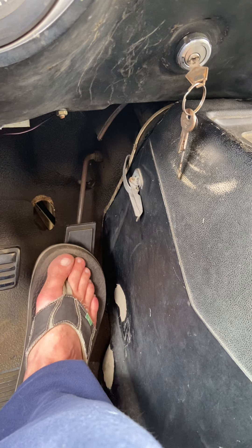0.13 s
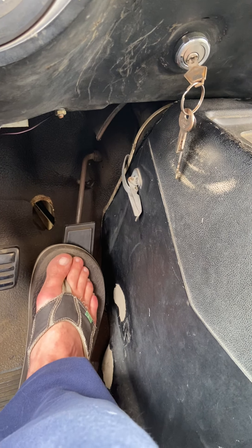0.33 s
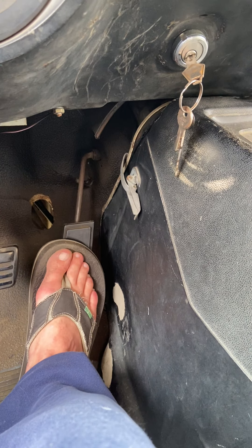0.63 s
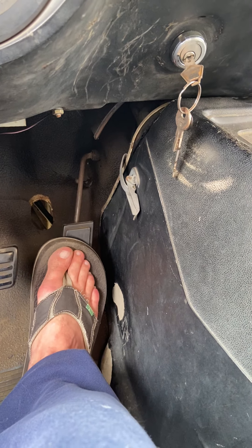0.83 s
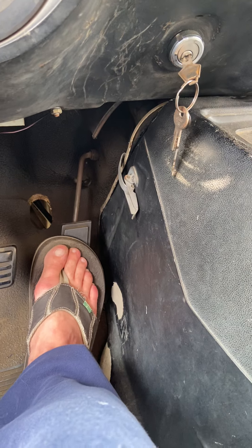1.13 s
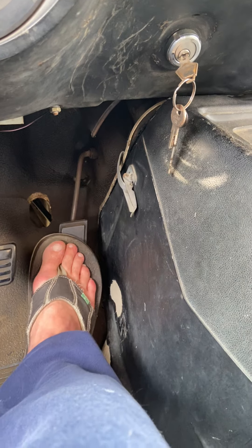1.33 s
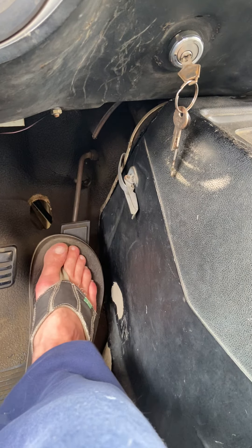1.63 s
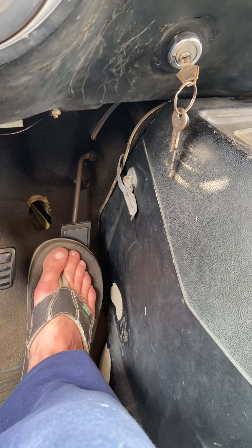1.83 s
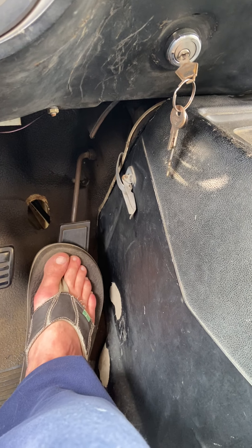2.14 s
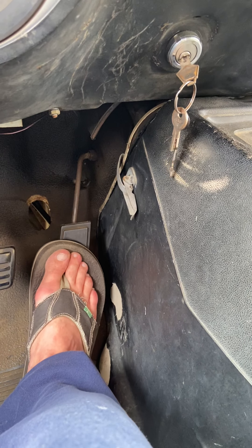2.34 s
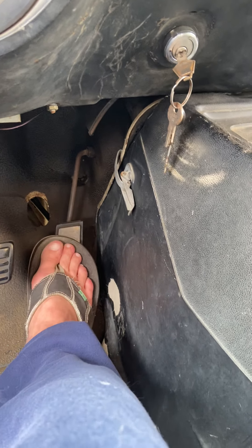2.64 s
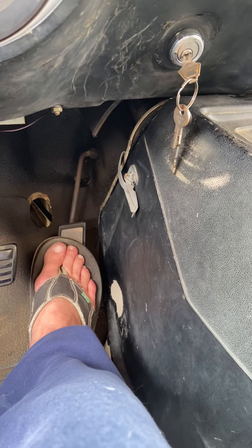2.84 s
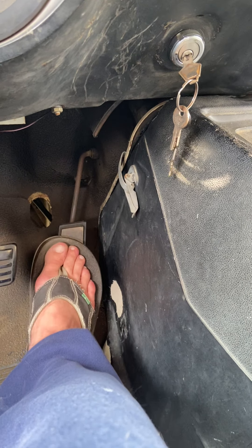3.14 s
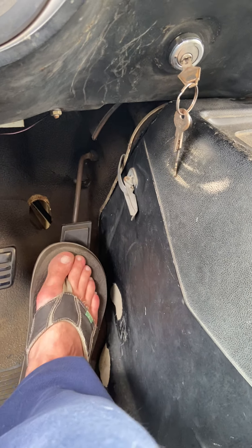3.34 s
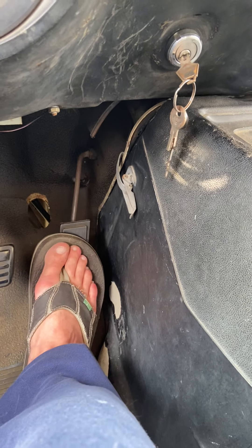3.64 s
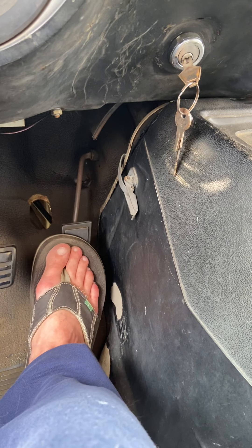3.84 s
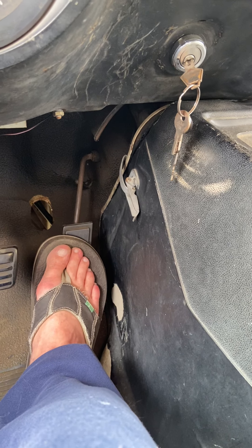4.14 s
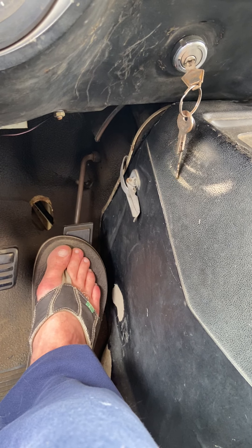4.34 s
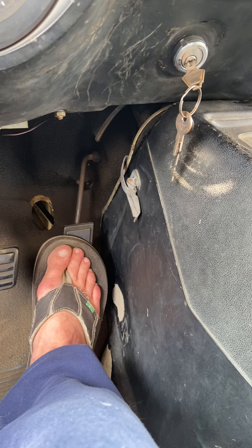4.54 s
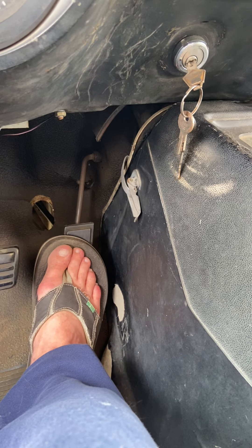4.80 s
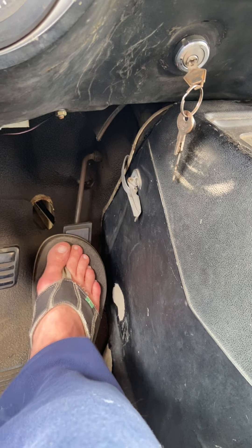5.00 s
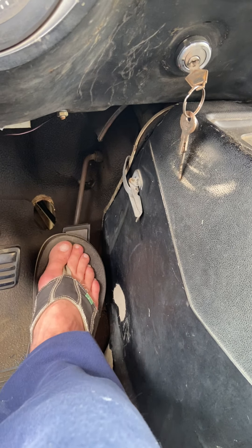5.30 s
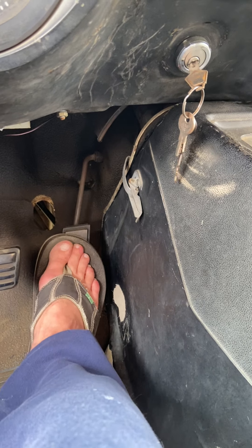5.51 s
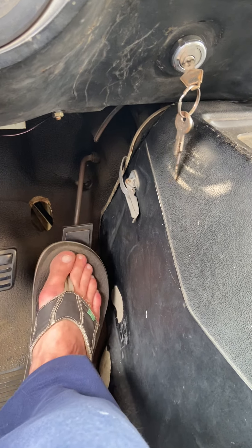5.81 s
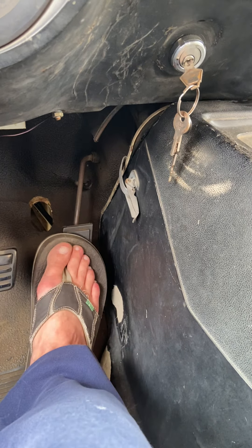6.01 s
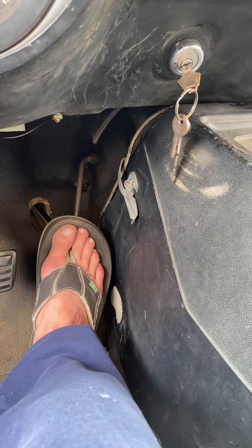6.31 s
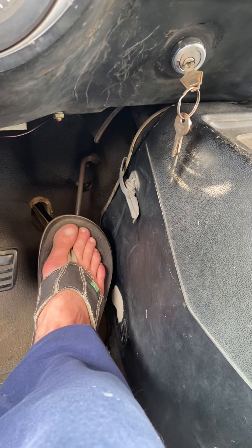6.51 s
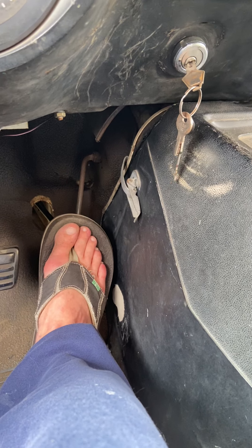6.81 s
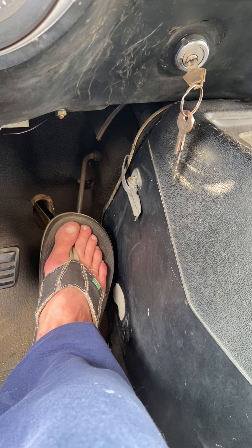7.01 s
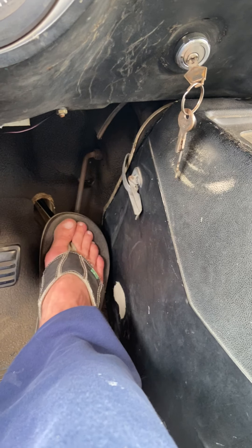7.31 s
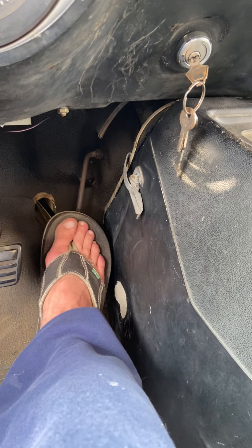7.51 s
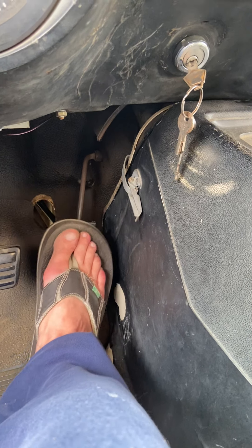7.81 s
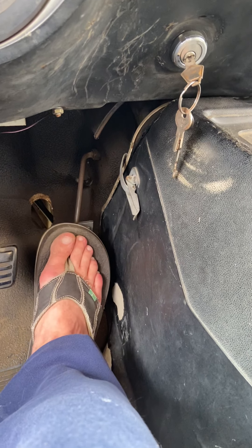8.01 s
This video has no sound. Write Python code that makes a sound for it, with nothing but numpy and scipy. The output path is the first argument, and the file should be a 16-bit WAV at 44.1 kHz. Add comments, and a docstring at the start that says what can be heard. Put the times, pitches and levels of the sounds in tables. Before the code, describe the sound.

Heard close in an old van's footwell through a phone's stereo microphones, a cold engine is already falling from a rev, its loose fan belt chirping about ten times a second until 0.5 s. It settles into a lumpy, booming idle with ticking tappets. Pedal rubs and thin, very high squeaks lead into a shorter blip at 1.3 s, peaking near 1.8 with belt honk and hoarse shrieks, then chirps. At 2.6 s a stronger blip stumbles, growls, coughs once and races to 3.3 s, the belt rasping and hissing; warbling chirps follow from 3.6 to 4.2. Uneven idle throbs until another squeaky press at 5.1 s, racing by 5.7 and chirping around 6 to 6.4. After more low idle, squeaks and scrapes at 7.2 s start the last blip, squealing to a peak near 7.8 and just beginning to run down and chirp at the end.

```python
"""Cold van engine in the footwell

A cold engine idles lumpily after a dying race and is blipped four times. Its firings force the mounts,
cab air and panels into resonance; filtered noise and overtones of the firing rate sound the intake.
The throttle linkage squeaks as gliding sines. The loose fan belt squeals by stick-slip, rasps as
modulated noise at high revs, and chirps once a belt turn as the engine runs down."""
import sys
import numpy as np
from scipy import signal
from scipy.fft import rfft, irfft, next_fast_len
from scipy.io import wavfile
from scipy.ndimage import uniform_filter1d

SR = 44100
rng = np.random.default_rng(int(sys.argv[2]) if len(sys.argv) > 2 else 0)


def log_audio(samples):
    """Write samples as a 16-bit WAV file to the path given in sys.argv[1]."""
    # one column per channel
    frames = np.atleast_2d(samples).T
    # limit to full scale, then quantise
    limited = np.clip(frames, -1, 1)
    pcm = np.round(limited * 32767).astype(np.int16)
    wavfile.write(sys.argv[1], SR, pcm)


N = 359415
T = np.arange(N) / SR
SIZE = next_fast_len(N + SR)  # padded, so that filter tails do not wrap around
FREQS = np.maximum(np.fft.rfftfreq(SIZE, 1 / SR), 1e-3)


def undb(db):
    """Logarithmic level: decibels to amplitude gain."""
    return 10 ** (np.asarray(db) / 20)


def unit(x):
    """Normalisation: scale to rms 1."""
    return x / np.sqrt(np.mean(x ** 2))


def steady(x, seconds):
    """Automatic gain: even out swells slower than the given time, keeping the quick throb."""
    size = int(seconds * SR)
    power = uniform_filter1d(uniform_filter1d(x ** 2, size), size)
    return x / np.sqrt(power + 1e-12)


def shape(x, response):
    """Linear filtering: multiply the spectrum by a frequency response."""
    return irfft(rfft(x, SIZE) * response, SIZE)[..., :N]


def colour(points):
    """Spectral envelope: zero-phase response through (Hz, dB) points."""
    hz, db = np.transpose(points)
    return undb(np.interp(np.log(FREQS), np.log(hz), db))


def ringing(points):
    """Minimum phase: a causal response through (Hz, dB) points, which rings on after each push."""
    cepstrum = irfft(np.log(colour(points)), SIZE)
    # folding the cepstrum onto positive time makes the response causal
    cepstrum[1:SIZE // 2] *= 2
    cepstrum[SIZE // 2 + 1:] = 0
    return np.exp(rfft(cepstrum))


def modes(table):
    """Modal superposition: summed response of (Hz, width in Hz, dB) resonances."""
    total = 0
    for hz, width, db in table:
        total = total + undb(db) / (1 + 1j * (FREQS ** 2 - hz ** 2) / (FREQS * width))
    return total


def noise():
    """White noise: equal mean power at every frequency."""
    return rng.standard_normal(N)


def walk(rate_hz):
    """Band-limited chance: smooth random motion of rms 1, mostly below the given rate."""
    hz = FREQS[FREQS < 10 * rate_hz]
    chance = noise()[:2 * len(hz)]
    spectrum = (chance[::2] + 1j * chance[1::2]) / (1 + (hz / rate_hz) ** 4)
    size = next_fast_len(2 * 2 * len(hz))
    slow = irfft(spectrum, size)
    slow_times = np.arange(size) * SIZE / size / SR
    return unit(np.interp(T, slow_times, slow))


def ramp(start, seconds):
    """Linear onset: rises from 0 to 1 in the given time."""
    return np.clip((T - start) / max(seconds, 1e-3), 0, 1)


def gate(start, end, attack_s, release_s):
    """Envelope: attack, hold and release between two moments."""
    return ramp(start, attack_s) * (1 - ramp(end - release_s, release_s))


def hump(along):
    """Half-ellipse envelope over a note whose progress runs from 0 to 1."""
    return np.sqrt(8 * along * (1 - along))


def partials(phase, table, shimmer_db=3.0):
    """Additive synthesis: (multiple, dB) partials of a phase, each flickering by itself."""
    total = 0
    for multiple, db in table:
        total = total + undb(db + shimmer_db * walk(105)) * np.sin(multiple * phase)
    return total


def stick_slip(hz, rough, shake_hz=260.3):
    """Stick-slip friction: phase of rubber catching and letting go with a shaky period."""
    return 2 * np.pi * np.cumsum(hz * (1 + rough * walk(shake_hz))) / SR


# Throttle blips; the first is already dying away. Each row: nominal opening in s, engine catches in s,
# top of the revs in s, stumbling rate in Hz, top rate in Hz, idle rate after it in Hz,
# run-down time in s, relative belt rasp in dB, relative intake level in dB.
BLIPS = [(-0.92, -0.66, -0.4, 38, 80, 29.5, 0.65, 3, -29), (1.355, 1.665, 1.82, 39, 59, 32, 0.4, 2, -33),
         (2.685, 2.925, 3.3, 39, 81, 31, 0.65, -1, -26),
         (5.16, 5.385, 5.68, 39, 74.5, 31.3, 0.58, 0, -27.5),
         (7.305, 7.55, 7.78, 43.5, 73, 31, 0.58, 0, -26)]
# the throttle starts to open this far ahead of the nominal opening, and to shut at the top of the revs
OPEN_LEAD_S, OPEN_S, SHUT_S = 0.04, 0.09, 0.12
COAST_POWER = 1.7  # the flywheel holds the revs up at first: power of time in the run-down


def firing_rate():
    """Rotational inertia: the engine stumbles, catches, races to its top and coasts back to idle."""
    rate = np.zeros(N)
    for opens, catches, top, stumble_hz, top_hz, idle_hz, rundown_s, *_ in BLIPS:
        rate = rate + (stumble_hz - rate) * ramp(opens - OPEN_LEAD_S, OPEN_S)
        rate = rate + (top_hz - rate) * np.sin(np.pi / 2 * ramp(catches, top - catches))
        coast = np.exp(-(np.abs(T - top) / rundown_s) ** COAST_POWER)
        rate = np.where(T < top, rate, idle_hz + (top_hz - idle_hz) * coast)
    return rate


def throttle(opens, top):
    """Valve control: how far the throttle is open during one blip, 0-1."""
    return gate(opens - OPEN_LEAD_S, top + SHUT_S, OPEN_S, SHUT_S)


def at_speed(table, rate):
    """Interpolation: the columns of a table over firing rate, sample by sample."""
    hz, *columns = np.transpose(table)
    return np.array([np.interp(rate, hz, column) for column in columns])


# Loudness with the throttle open. Each row: firing rate in Hz, then relative levels in dB of cab boom,
# panel drone, clatter, belt rasp and belt hiss.
PULLING = [(38, -12, -21.5, -40.5, -39.5, -55), (57, -12.5, -21, -38.5, -28.5, -48),
           (69, -12.5, -19, -39, -21.5, -31), (80, -15, -16, -42, -22, -30)]
# The same with the throttle shut; a sagging idle booms, and the panels drone where an order meets them.
# Each row: firing rate in Hz, then relative levels in dB of boom, drone, clatter, rasp and hiss.
COASTING = [(30.5, -14, -27, -45.5, -57, -64), (32.3, -19, -24, -46.5, -56, -63),
            (38, -16.5, -27, -45, -55.5, -61), (46, -20, -27, -44, -54, -58),
            (58, -24, -19, -42.5, -41, -54), (68, -24, -22, -43, -34, -53), (80, -20, -17, -45, -30, -48)]


def loudness(rate, load):
    """Load dependence: five levels in dB between coasting (load 0) and pulling (load 1)."""
    return (1 - load) * at_speed(COASTING, rate) + load * at_speed(PULLING, rate)


# Resonance of the rubber mounts. The row: frequency in Hz, width of one stage in Hz, relative level in dB.
MOUNTS = (48, 23, -19.5)


def mounts(count, load, rumble_db=14.5, waver_db=2.5):
    """Forced resonance: the engine rumbles on its mounts and rocks hard as firings pass their frequency."""
    hz, width, db = MOUNTS
    rocking = unit(np.sin(2 * np.pi * count)) * (1 - load) * undb(waver_db * walk(9))
    response = modes([(hz, width, 0)]) ** 3
    return shape(rocking + undb(rumble_db) * noise(), response) * undb(db)


# Shaking forces of the engine. Each row: multiple of the firing rate, relative level in dB.
ORDERS_DB = [(0.5, -17), (0.75, -12), (1, -10), (1.25, -12), (1.5, -3), (1.75, -17), (2, 0), (2.25, -20),
             (2.5, -14), (3, -10), (3.25, -16), (3.5, -9), (4, -7), (5, -9), (6, -9)]


def shaking(count):
    """Engine orders: harmonics and fractions of the firing rate; uneven burns make each waver."""
    orders = 0
    for multiple, db in ORDERS_DB:
        sway_rad, waver_db = 0.28 * walk(6), 2.5 * walk(8)
        orders = orders + undb(db + waver_db) * np.sin(2 * np.pi * multiple * count + sway_rad)
    return unit(orders)


# How the air of the cab answers. Each row: frequency in Hz, gain in dB.
CAB = [(20, -27), (32, -21), (40, -12), (46, -6), (54, 1), (64, 0), (77, 2), (86, -3), (98, -14),
       (125, -38), (600, -100)]
# How the floor and engine cover answer. Each row: frequency in Hz, gain in dB.
PANELS = [(40, -50), (70, -36), (98, -10), (112, 3), (125, -1), (140, -11), (158, -10.5), (178, -25),
          (260, -42), (900, -100)]
# ragged burns: their rumble against the engine orders, and how it grows with the firing rate
RUMBLE_DB, RUMBLE_FROM_HZ, RUMBLE_DB_PER_HZ = 9, 31, 0.18


def boom(count, rate, boom_db, drone_db, burn_decay=0.35):
    """Cavity and plate resonance: orders and ragged cold burns shake air and panels; burns win at high revs."""
    # burn_decay is a share of one firing period
    thuds = unit(noise() * np.exp(-(count % 1) / burn_decay))
    rumble_db = RUMBLE_DB + RUMBLE_DB_PER_HZ * (rate - RUMBLE_FROM_HZ)
    drive = thuds * undb(rumble_db) - shaking(count)
    air = steady(shape(drive, ringing(CAB)), 0.06) * undb(boom_db)
    panels = steady(shape(drive, ringing(PANELS)), 0.09) * undb(drone_db)
    return air + panels


# Colour of the valve train and block. Each row: frequency in Hz, relative spectral density in dB per Hz.
CLATTER = [(150, 2), (220, 5), (275, 8), (340, -0.5), (450, -3), (560, 3), (820, -7), (965, -4),
           (1100, -12), (1780, -14.5), (1990, -7), (2200, -15.5), (2600, -20), (3500, -23), (6000, -23),
           (10000, -25), (16000, -28)]


def clatter(count, clatter_db, trim_db=8.0, tick_db=-5.0, tick_decay=0.16):
    """Impact noise: tappets tick twice a firing over the even rush of the block and fan."""
    # tick_decay is a share of one tick period
    ticks = np.exp(-(2 * count % 1) / tick_decay) * undb(tick_db + 4.3 * walk(37))
    return unit(shape(noise() * (1 + ticks), colour(CLATTER))) * undb(clatter_db + trim_db)


# Colour of the air intake. Each row: frequency in Hz, gain in dB.
INTAKE = [(130, -18), (160, 5), (200, 1), (240, -1), (280, -2.5), (330, -17), (480, -38)]
# The cold engine coughs once through the intake. The row: start in s, length in s, relative level in dB.
COUGH = (3.025, 0.04, -19)
# the intake growl fades as the revs rise past the stumble
GROWL_FULL_HZ, GROWL_FADE_DB_PER_HZ = 58, 0.62


def growl(count, rate, trim_db=-1.0, gulp_db=12.0):
    """Pulsating flow: gulped air sounds the intake with overtones of the firing rate and turbulence."""
    gain = sum(throttle(opens, top) * undb(db) for opens, _, top, *_, db in BLIPS)
    gain = gain * undb(-GROWL_FADE_DB_PER_HZ * np.maximum(rate - GROWL_FULL_HZ, 0))
    start, length, cough_db = COUGH
    gain = gain + undb(cough_db) * np.sin(np.pi * ramp(start, length))
    overtones = partials(2 * np.pi * count, [(2, -3), (3, -3), (4, 0), (5, -6), (6, -2), (7, -8), (8, -6)])
    intake = steady(shape(overtones + undb(gulp_db) * noise(), colour(INTAKE)), 0.1)
    return undb(trim_db) * gain * intake


# Modes of the pedal and its bracket. Each row: frequency in Hz, width in Hz, relative level in dB.
PEDAL = [(934, 45, 9), (730, 100, 4), (1882, 73, -12)]
# The pedal rubs in its bracket. Each row: start in s, length in s, relative level in dB.
SCRAPES = [(0.913, 0.031, -41), (1.037, 0.02, -33.5), (2.565, 0.076, -34), (2.652, 0.025, -38),
           (5.066, 0.051, -33), (5.13, 0.023, -33.5), (7.152, 0.043, -39), (7.205, 0.031, -35),
           (7.274, 0.044, -31.5)]


def pedal(trim_db=1.5):
    """Friction-excited modes: short dry rubs ring the pedal bracket."""
    force = np.zeros(N)
    for start, length, db in SCRAPES:
        along = np.clip((T - start) / length, 0, 1)
        force += undb(db + trim_db) * np.sin(np.pi * np.sqrt(along))
    ring = modes(PEDAL)
    return shape(noise() * force, ring) / np.sqrt(np.mean(np.abs(ring) ** 2))


# Throttle linkage squeaks. Each row: start in s, length in s, nominal start pitch in Hz,
# nominal end pitch in Hz, level in dB.
SQUEAKS = [(1.209, .05, 10140, 10350, -55), (1.261, 0.036, 10350, 10540, -38),
           (1.315, 0.02, 10600, 10620, -45), (1.332, .036, 12350, 12500, -44),
           (1.376, 0.036, 11650, 11400, -47), (1.562, 0.035, 5230, 5860, -38),
           (2.55, 0.045, 10030, 10500, -40.5), (5.033, .042, 10430, 10340, -36.5),
           (5.075, 0.034, 11960, 11720, -39), (7.165, 0.027, 10270, 10270, -44),
           (7.189, 0.053, 10350, 10700, -36.5), (7.279, 0.016, 11910, 11800, -45)]


def linkage():
    """Dry friction: the throttle pivot gives thin, gliding squeaks as the pedal goes down."""
    out, waver = np.zeros(N), 0.006 * walk(150)
    for start, length, from_hz, to_hz, db in SQUEAKS:
        along = np.clip((T - start) / length, 0, 1)
        hz = (from_hz + (to_hz - from_hz) * along) * (1 + waver)
        out += undb(db) * hump(along) * np.sin(2 * np.pi * np.cumsum(hz) / SR)
    return out


# Ring of the pulleys and brackets. Each row: frequency in Hz, width in Hz, relative level in dB.
PULLEYS = [(556, 42, 8), (1298, 57, 3), (1460, 80, 5.5), (2060, 55, 6.5), (3135, 72, -2), (3850, 90, 2),
           (4320, 46, -5.5), (4580, 69, -11), (5296, 66, -3.5), (5610, 23, -13)]
# Colour of rubber scraping on steel. Each row: frequency in Hz, relative spectral density in dB per Hz.
RASP = [(250, -54), (500, -1.5), (900, -1), (1500, -2), (2400, -6), (3300, -10.5), (4800, -6.5),
        (6000, -8.5), (7000, -24), (9000, -50), (16000, -52)]
# Colour of the belt's hiss. Each row: frequency in Hz, relative gain in dB.
HISS = [(4500, 5), (7000, -0.5), (9700, 3.5), (11500, -2.5), (13500, -3), (15500, -7)]


def rasp(count, rasp_db, hiss_db, ring_db=1.5, grit_db=0.9, flutter_db=0.7, swell_db=2.5, throb=0.26,
         rasp_trim_db=2.1, hiss_trim_db=7.0):
    """Sliding friction: dense tiny slips, tugged by each firing, scrape and ring separately swelling modes."""
    slips = undb(grit_db * walk(460) + flutter_db * walk(44)) * (1 + throb * np.cos(2 * np.pi * count))
    ring = sum(shape(noise(), modes([mode])) * undb(swell_db * walk(25)) for mode in PULLEYS)
    scrape = steady(shape(noise(), colour(RASP)) + undb(ring_db) * ring, 0.008)
    hiss = unit(shape(noise(), colour(HISS)))
    return slips * (scrape * undb(rasp_db + rasp_trim_db) + hiss * undb(hiss_db + hiss_trim_db))


# The belt breaks fully loose and the rasp jumps up. Each row: start in s, end in s, rise of the rasp in dB.
BITES = [(1.89, 2.04, 3), (2.69, 2.79, 2), (3.072, 3.2, 3), (5.44, 5.56, 3.5), (7.56, 7.625, 5.5),
         (7.668, 7.73, 2.5)]
BITE_ATTACK_S, BITE_RELEASE_S = 0.01, 0.035


def bites():
    """Loss of grip: the rise in dB of the rasp while the belt is fully loose."""
    return sum(gate(start, end, BITE_ATTACK_S, BITE_RELEASE_S) * db for start, end, db in BITES)


# A pulley mode catches and shrieks. Each row: start in s, length in s, mean pitch in Hz, relative level in dB.
SHRIEKS = [(1.39, 0.06, 3950, -39), (1.698, 0.07, 1515, -24), (1.855, 0.08, 1485, -22),
           (3.11, 0.075, 1470, -20), (3.115, 0.07, 3900, -26), (3.232, 0.062, 3920, -20),
           (5.495, 0.07, 1450, -20), (5.583, 0.035, 3830, -21), (7.668, 0.035, 1500, -19),
           (7.672, 0.056, 3850, -19)]


def shrieks():
    """Mode locking: at the hardest slips one pulley mode takes over in a short, hoarse shriek."""
    out, shake_hz = np.zeros(N), 75 * walk(200)
    for start, length, hz, db in SHRIEKS:
        phase = 2 * np.pi * np.cumsum(hz + shake_hz) / SR
        out += undb(db) * hump(ramp(start, length)) * np.sin(phase)
    return out * undb(-2 + 2.5 * walk(90))


# Belt chirps as the engine runs down. Each row: start in s, end in s, nominal moment in s when the belt's
# slickest patch meets the pulley, time of a belt turn in s, relative levels in dB of pulley ring and warble.
CHIRPS = [(-0.05, 0.275, 0.047, 0.098, -30, -29.5), (0.245, 0.38, 0.345, 0.1, -30, -37),
          (0.375, 0.48, 0.448, 0.1, -32, -39), (1.94, 2.065, 2.015, 0.1, -27, -36),
          (2.035, 2.15, 2.115, 0.1, -30, -30), (2.15, 2.24, 2.215, 0.1, -33.5, -39),
          (3.6, 3.735, 3.695, 0.09, -34, -39), (3.705, 3.99, 3.785, 0.094, -32, -32.5),
          (3.98, 4.11, 4.075, 0.1, -32, -37), (4.14, 4.21, 4.165, 0.1, -37, -50),
          (5.925, 6.265, 5.958, 0.09, -32.5, -33), (6.25, 6.36, 6.315, 0.1, -35.5, -42),
          (7.97, 8.3, 8.068, 0.09, -34, -33)]
# How the pulleys and brackets radiate the warble. Each row: frequency in Hz, gain in dB.
WARBLE = [(900, -22), (1230, -2), (1450, -2), (1650, -9), (2100, -13), (2450, 1), (2680, -1), (2830, -4),
          (3080, 2), (3200, -1), (3350, -14), (3680, 0), (4050, -10), (4550, -1), (4950, -9), (5400, -4),
          (6500, -20)]
CHIRP_ATTACK_S, CHIRP_RELEASE_S = 0.02, 0.035
CHIRP_RASP_DB = -8  # the belt keeps scraping faintly under its chirps: rasp against warble


def chirps(centre_hz=1375, swing_hz=140, ring_hz=1455, ring_width_hz=120, snap=2.4, trough_db=-3.0,
           turn_sway=0.3, flank_count=2, warble_trim_db=-0.3):
    """Frequency modulation: two rough belt flanks flip in pitch once a turn, and a pulley mode resonates."""
    swing, ring_gain, warble_gain = np.zeros(N), np.zeros(N), np.zeros(N)
    sway_rad = turn_sway * walk(45)
    for start, end, crest, turn_s, ring_db, warble_db in CHIRPS:
        turning = np.cos(2 * np.pi * (T - crest) / turn_s + sway_rad)
        swing = np.where(T > start, turning, swing)
        sounding = gate(start, end, CHIRP_ATTACK_S, CHIRP_RELEASE_S)
        ring_gain += sounding * undb(ring_db)
        warble_gain += sounding * undb(warble_db + warble_trim_db)
    # tanh squares off the swing, so the pitch flips rather than glides
    hz = centre_hz + swing_hz * np.tanh(snap * swing) / np.tanh(snap)
    flanks = 0
    for _ in range(flank_count):
        phase = stick_slip(hz, rough=0.07, shake_hz=600)
        flanks = flanks + partials(phase, [(1, -1), (2, 0), (3, -7), (4, -12)])
    ring = steady(shape(flanks, modes([(ring_hz, ring_width_hz, 0)]) ** 2), 0.02)
    ring = ring * undb(trough_db * np.maximum(-swing, 0))
    warble = steady(shape(flanks, colour(WARBLE)), 0.04) * undb(1.6 * walk(22))
    scrape = undb(CHIRP_RASP_DB) * unit(shape(noise(), colour(RASP)))
    return ring_gain * ring + warble_gain * (warble + scrape)


# The belt slips under load. Each row: start in s, end in s, relative squeal level in dB.
SLIPS = [(1.356, 2.04, -1), (2.683, 2.875, 0), (2.888, 3.625, 0), (5.16, 5.925, 0), (7.305, 8.02, 0)]
SLIP_ATTACK_S, SLIP_RELEASE_S = 0.014, 0.04
# the belt stays strained a moment after the top of the revs
STRAIN_HOLD_S, STRAIN_RELEASE_S = 0.03, 0.22


def strain():
    """Belt traction: drag over the pulleys, 0-1, only while the belt slips and the engine pulls."""
    pull = 0
    for opens, _, top, *_ in BLIPS:
        end = top + STRAIN_HOLD_S + STRAIN_RELEASE_S
        pull = pull + gate(opens - OPEN_LEAD_S, end, OPEN_LEAD_S, STRAIN_RELEASE_S)
    return pull * sum(gate(start, end, SLIP_ATTACK_S, SLIP_RELEASE_S) for start, end, _ in SLIPS)


# Voice of the slipping belt. Each row: firing rate in Hz, nominal pitch in Hz, relative level in dB,
# relative level of its octave in dB.
SQUEAL_VOICE = [(38, 780, -23, -33), (55, 768, -23.5, -22.5), (67, 757, -27.5, -27), (80, 750, -33, -26)]


def squeal(rate, trim_db=-0.6, octave_trim_db=-5.5, edge_db=-14.5, wander=0.016, flutter_db=1.8,
           scoop_hz=25, scoop_s=0.05):
    """Stick-slip oscillation: the loaded belt honks, scooping up at each slip and sagging as revs rise."""
    hz, db, octave_db = at_speed(SQUEAL_VOICE, rate)
    slip, scoop = 0, 0
    for start, end, slip_db in SLIPS:
        slip = slip + gate(start, end, SLIP_ATTACK_S, SLIP_RELEASE_S) * undb(slip_db)
        scoop = scoop + (T > start) * (1 - ramp(start, scoop_s))
    slip = slip * undb(flutter_db * walk(14))
    gain = slip * undb(db + trim_db)
    octave_gain = slip * undb(octave_db + octave_trim_db)
    phase = stick_slip((hz - scoop_hz * scoop) * (1 + wander * walk(16)), rough=0.048)
    edge = partials(phase, [(3, 1), (4, -7), (5, -2), (6, -5), (7, -11)])
    honk = partials(phase, [(1, 0)], shimmer_db=1.8) + undb(edge_db) * edge
    return gain * honk + octave_gain * partials(phase, [(2, 0)])


def footwell(x, t60_s=0.18, wet_db=-6.5):
    """Reverberation: close hard surfaces add a short decaying scatter, different at each port."""
    t = T[:SR // 4]
    tails = rng.standard_normal((2, len(t))) * np.exp(-np.log(1000) * t / t60_s)
    tails /= np.sqrt(np.sum(tails ** 2, axis=1, keepdims=True))
    return x + undb(wet_db) * signal.fftconvolve(x[None], tails, axes=1)[:, :N]


def scene(hiss_flicker_db=1.8, bite_hiss_share=1.3):
    """Superposition: speed and throttle drive every layer; long bass waves reach both ports alike."""
    rate, drag = firing_rate(), strain()
    count = np.cumsum(rate) / SR  # firings so far
    load = sum(throttle(opens, top) for opens, _, top, *_ in BLIPS)
    boom_db, drone_db, clatter_db, _, _ = loudness(rate, load)
    *_, rasp_db, hiss_db = loudness(rate, drag)
    belt_db = np.zeros(N)
    for opens, *_, db, _ in BLIPS:
        belt_db = np.where(T > opens, db, belt_db)
    bite_db = bites()
    hiss_db = hiss_db + bite_hiss_share * bite_db + hiss_flicker_db * drag * walk(25)
    scraping = undb(belt_db) * rasp(count, rasp_db + bite_db, hiss_db)
    belt = scraping + squeal(rate) + shrieks() + chirps()
    bass = boom(count, rate, boom_db, drone_db) + mounts(count, load) + growl(count, rate)
    bright = clatter(count, clatter_db) + belt + linkage() + pedal()
    return bass + footwell(bright)


# Phase by which the left microphone port leads. Each row: frequency in Hz, phase in radians.
PORTS = [(0, 0), (150, .05), (520, .5), (1720, .1), (3190, 1.1), (4310, 1.1), (5000, .4), (6200, 1.5),
         (7400, 3.14), (10300, 6.28), (13600, 9.42), (16600, 12.8)]
# Level at the left port over the right. Each row: frequency in Hz, difference in dB.
PORT_BALANCE = [(60, -1.0), (110, -1.5), (200, -2.0), (380, -4.0), (700, 0.5), (1290, -1.0), (2380, -0.5),
                (4400, -2.0), (8120, 0.0), (15000, 0.0)]
TOP_HZ = 16000


def record(dry, lean_share=0.5):
    """Interchannel phase: two phone ports hear treble out of step; the peaks are clipped, the top cut."""
    hz, radians = np.transpose(PORTS)
    lean = colour(PORT_BALANCE) ** lean_share
    lag = np.exp(-1j * np.interp(FREQS, hz, radians))
    left = shape(dry[0], lean)
    right = shape(dry[1], lag / lean)
    low_pass = signal.ellip(10, 0.1, 80, TOP_HZ, fs=SR, output="sos")
    return signal.sosfilt(low_pass, np.clip([left, right], -1, 1))


dry = scene()
out = record(dry)
log_audio(out)
```